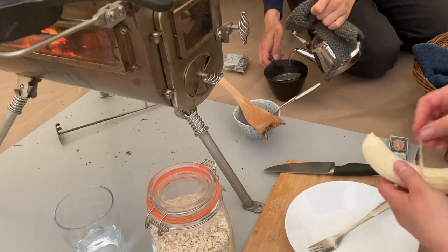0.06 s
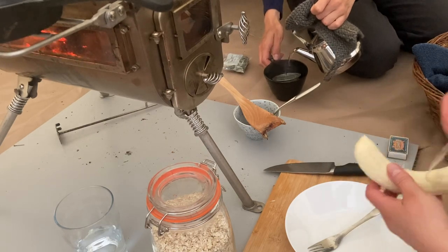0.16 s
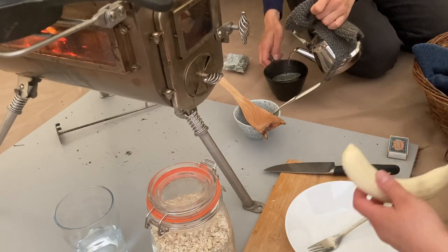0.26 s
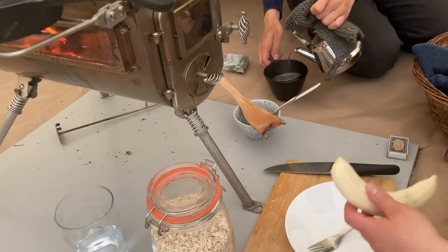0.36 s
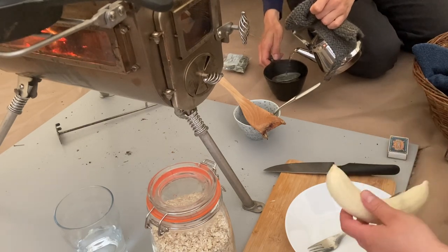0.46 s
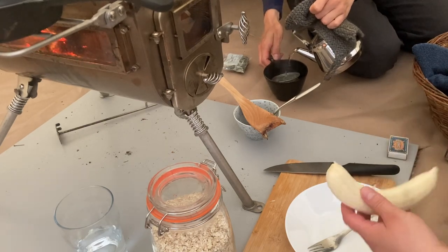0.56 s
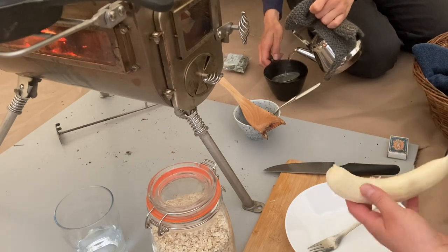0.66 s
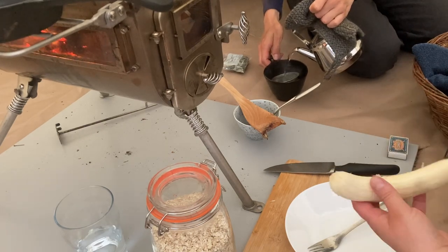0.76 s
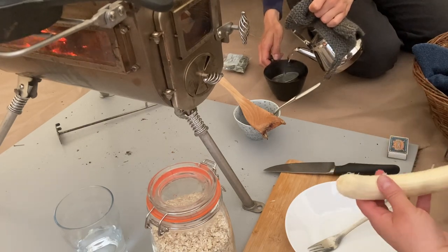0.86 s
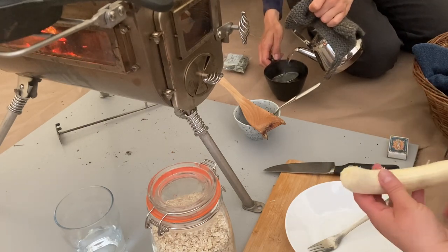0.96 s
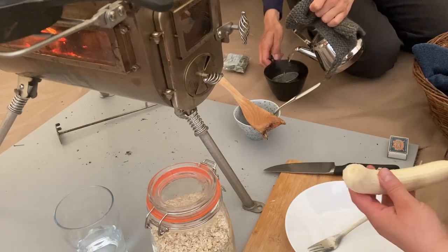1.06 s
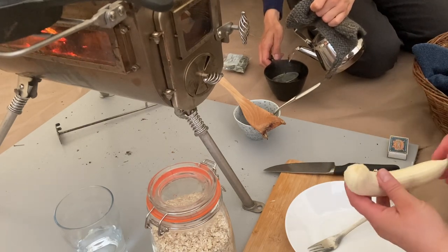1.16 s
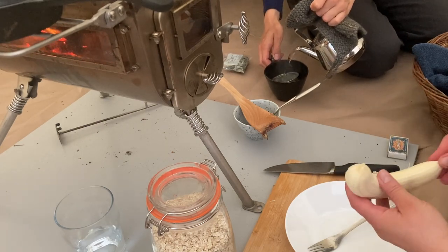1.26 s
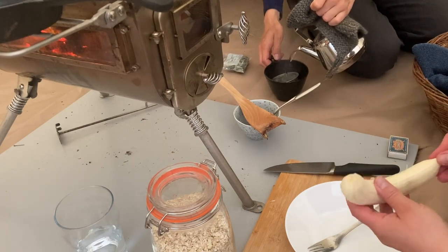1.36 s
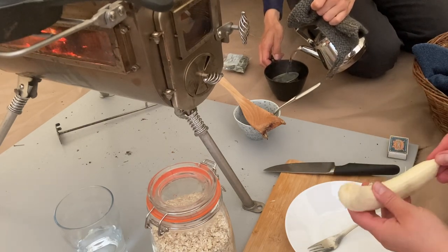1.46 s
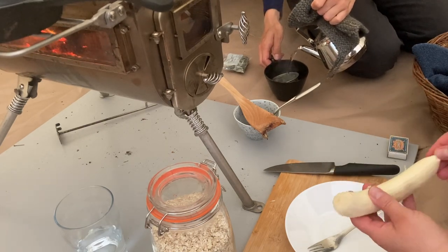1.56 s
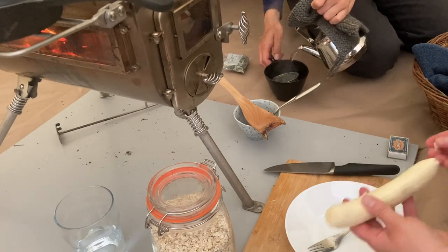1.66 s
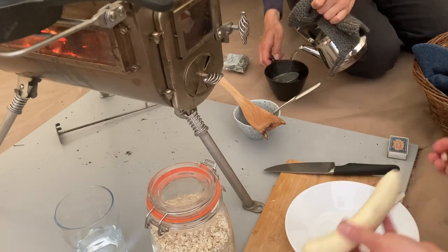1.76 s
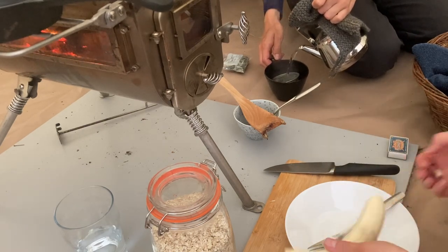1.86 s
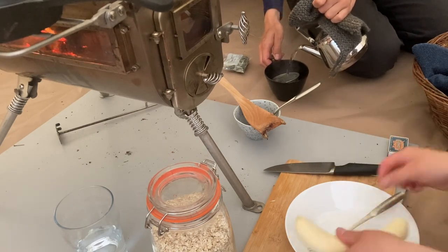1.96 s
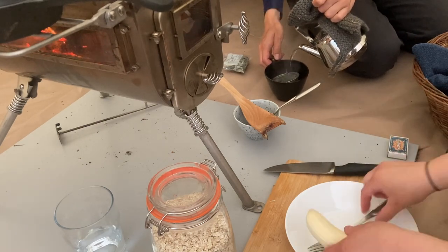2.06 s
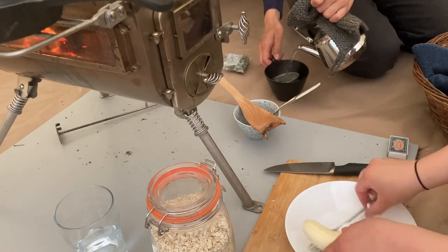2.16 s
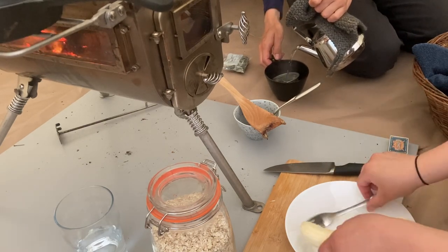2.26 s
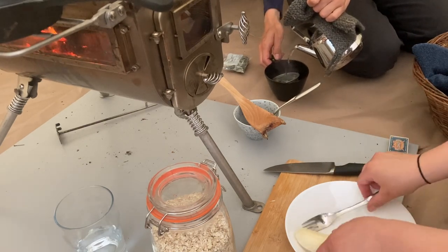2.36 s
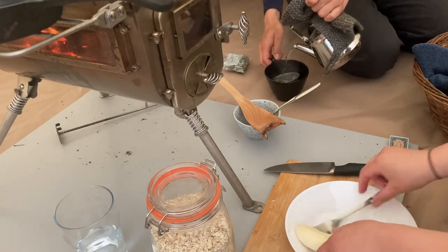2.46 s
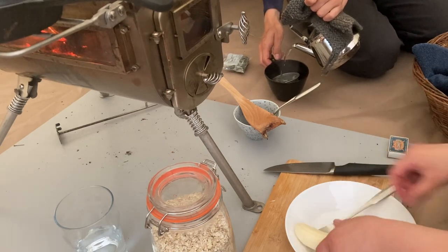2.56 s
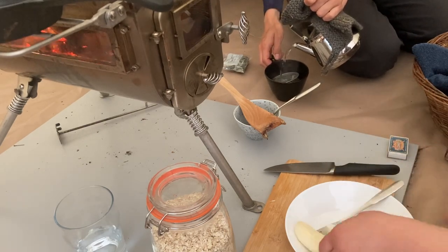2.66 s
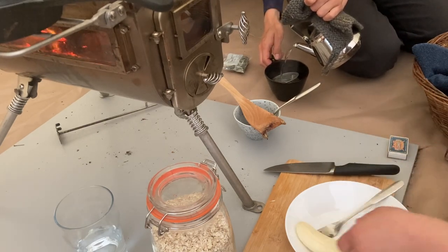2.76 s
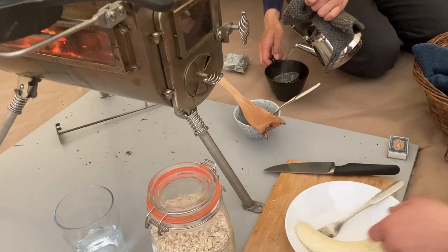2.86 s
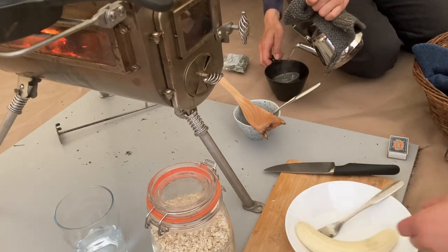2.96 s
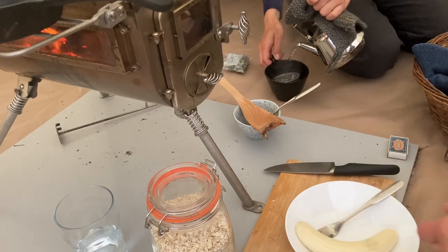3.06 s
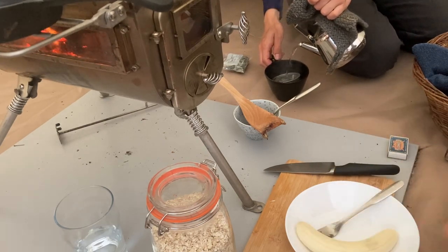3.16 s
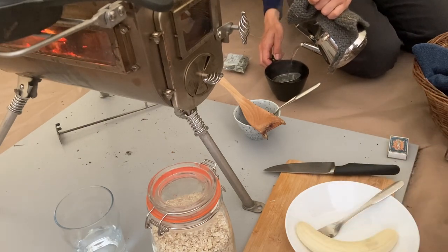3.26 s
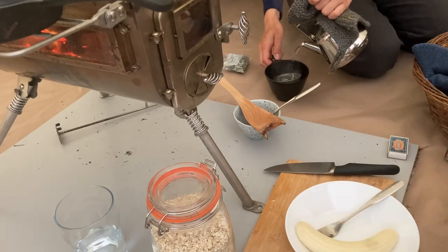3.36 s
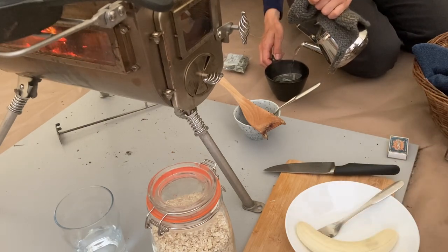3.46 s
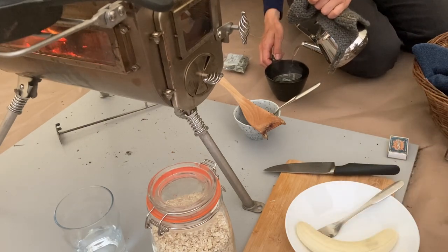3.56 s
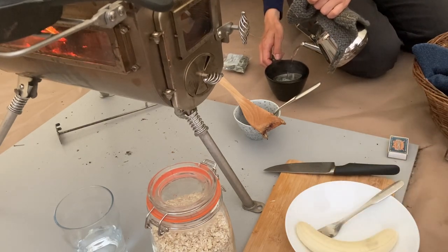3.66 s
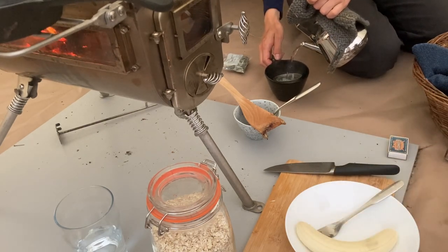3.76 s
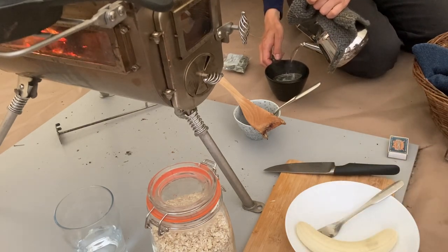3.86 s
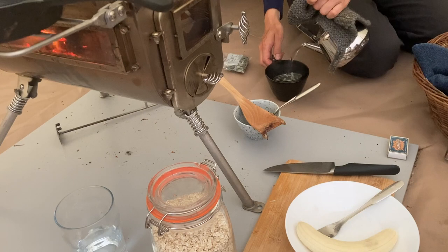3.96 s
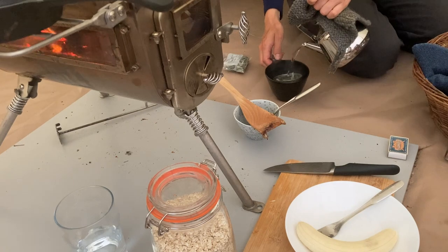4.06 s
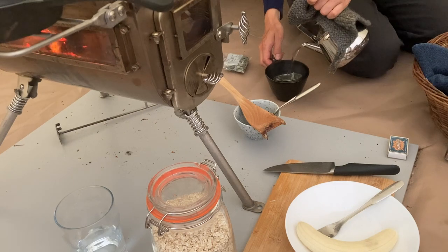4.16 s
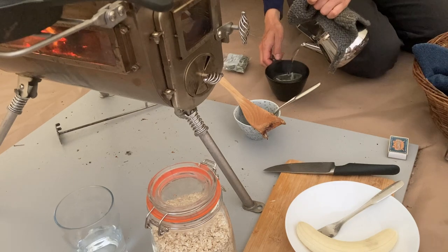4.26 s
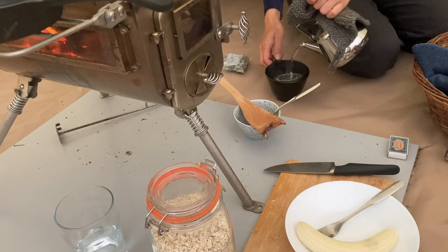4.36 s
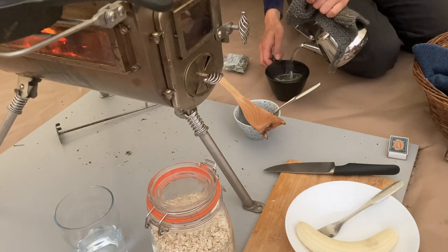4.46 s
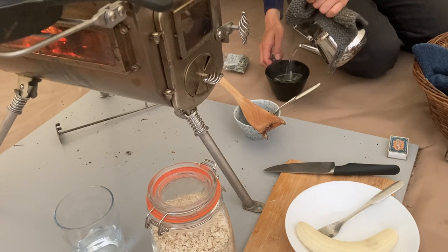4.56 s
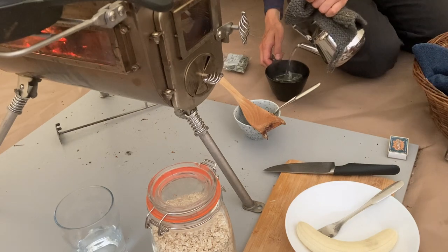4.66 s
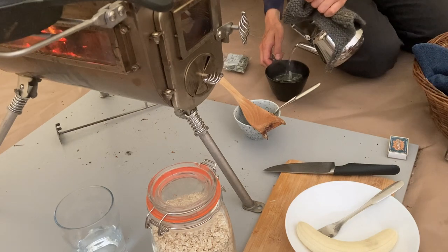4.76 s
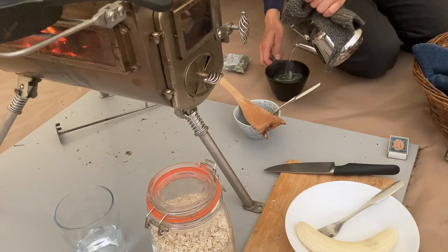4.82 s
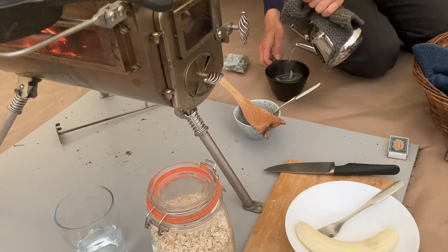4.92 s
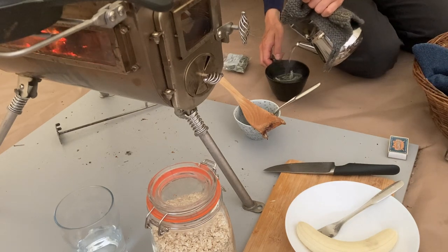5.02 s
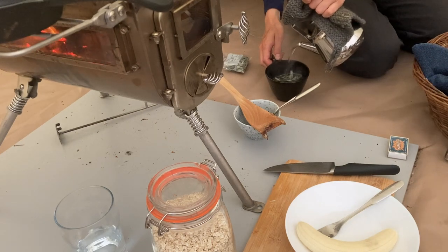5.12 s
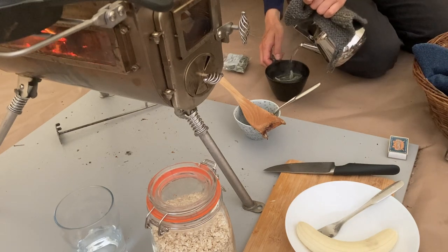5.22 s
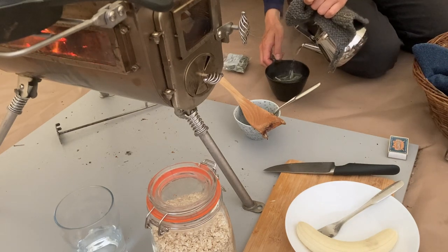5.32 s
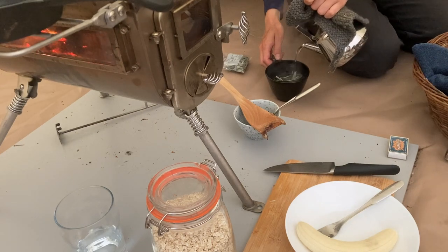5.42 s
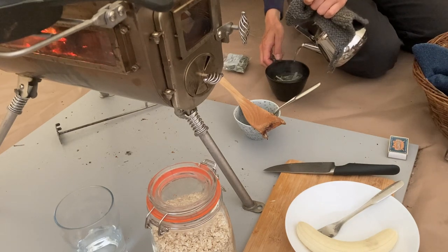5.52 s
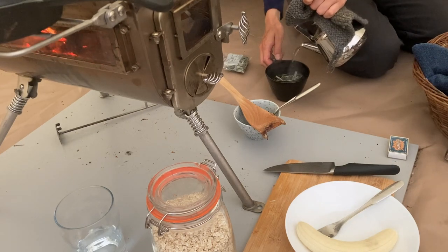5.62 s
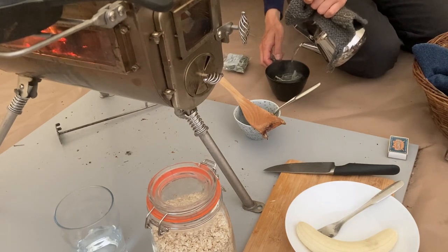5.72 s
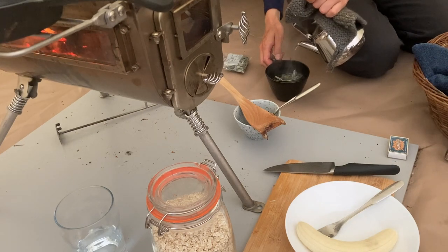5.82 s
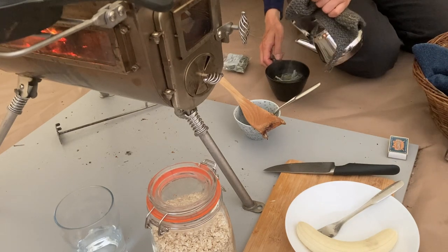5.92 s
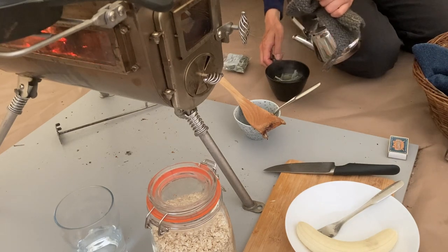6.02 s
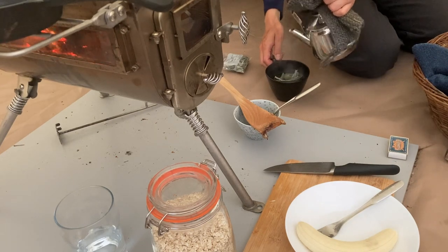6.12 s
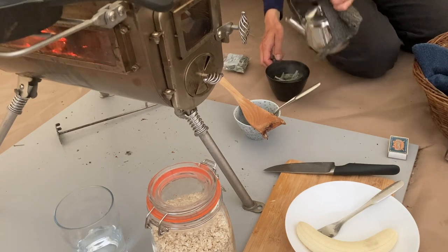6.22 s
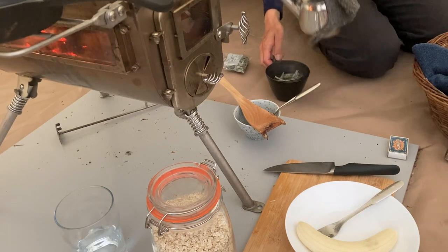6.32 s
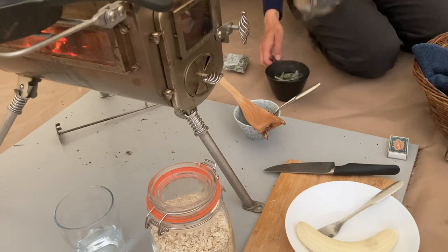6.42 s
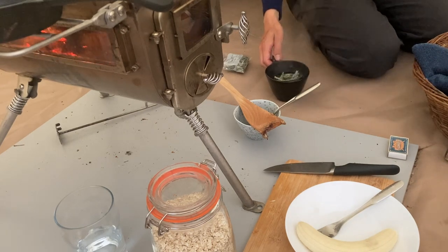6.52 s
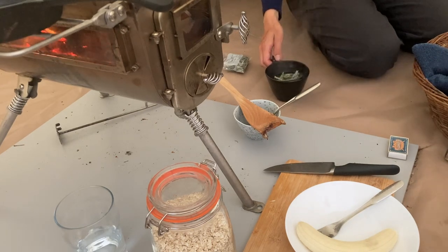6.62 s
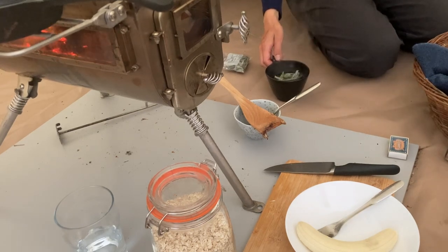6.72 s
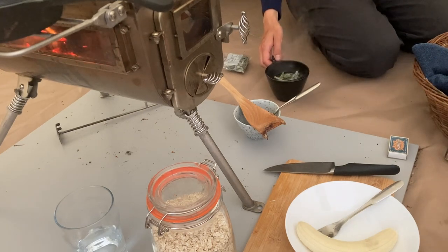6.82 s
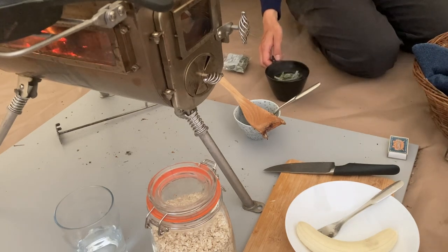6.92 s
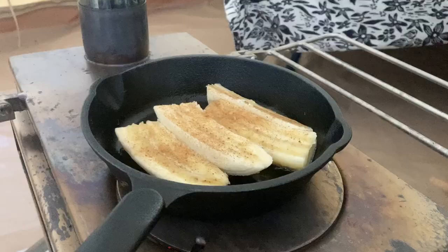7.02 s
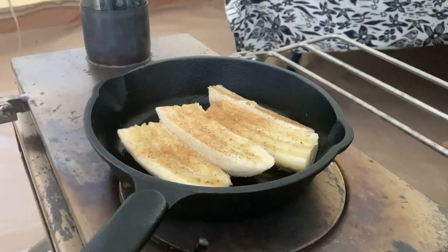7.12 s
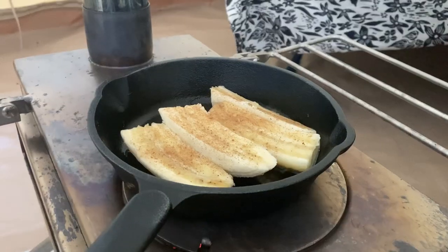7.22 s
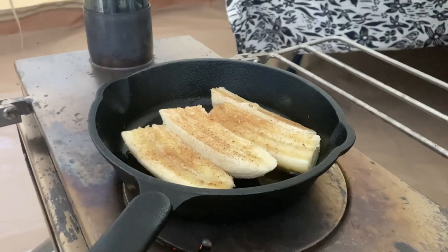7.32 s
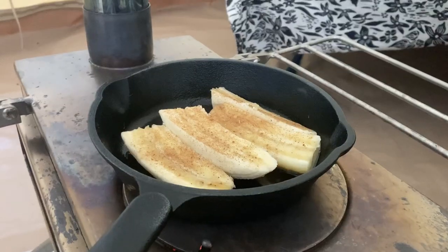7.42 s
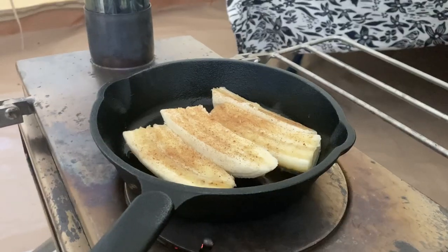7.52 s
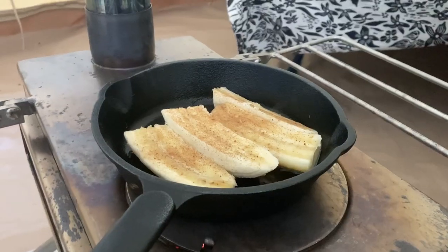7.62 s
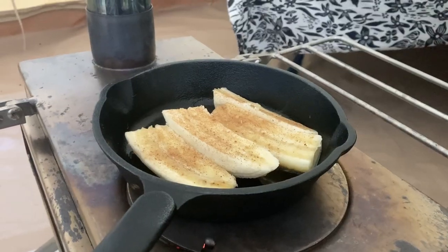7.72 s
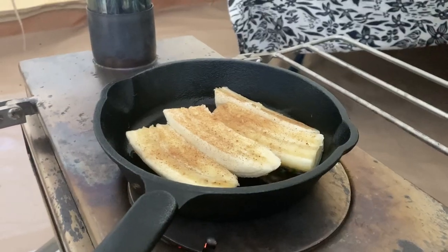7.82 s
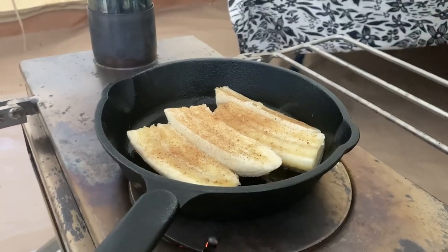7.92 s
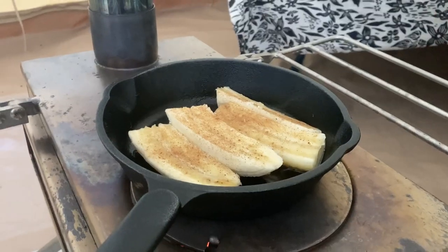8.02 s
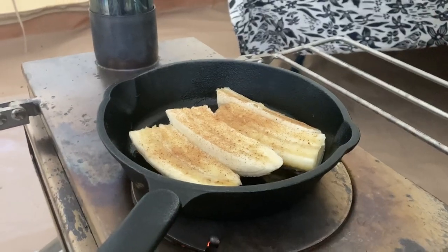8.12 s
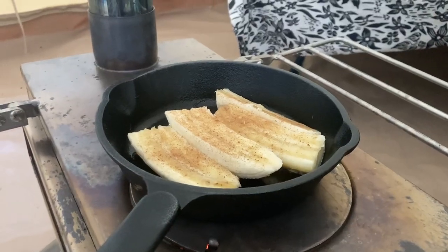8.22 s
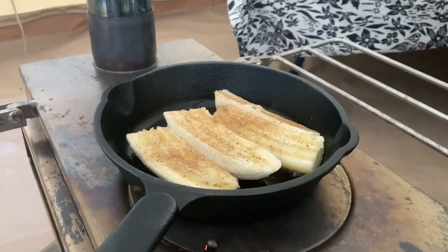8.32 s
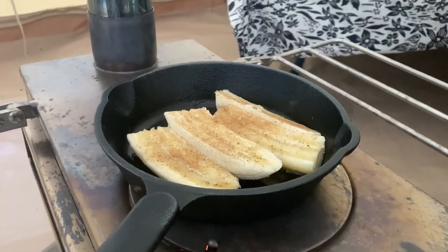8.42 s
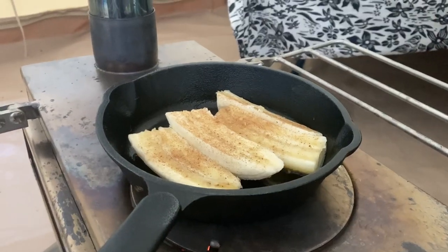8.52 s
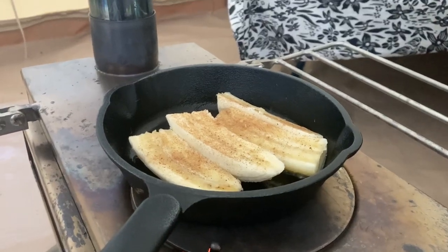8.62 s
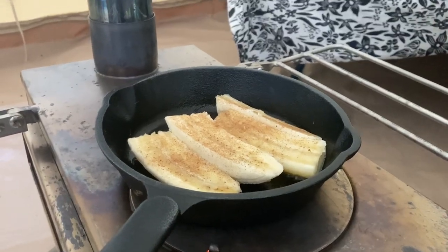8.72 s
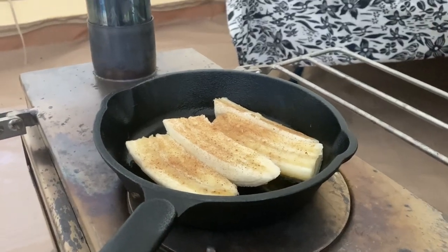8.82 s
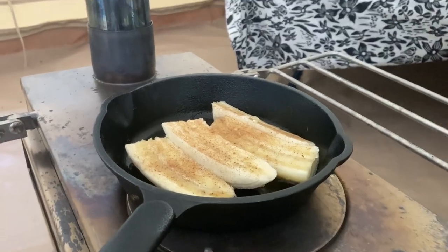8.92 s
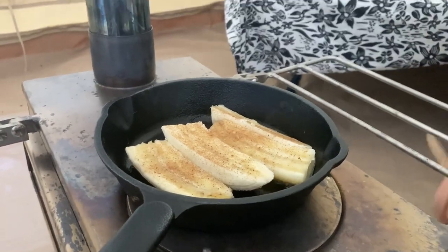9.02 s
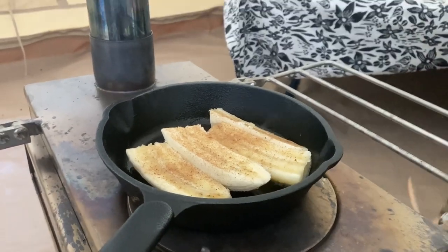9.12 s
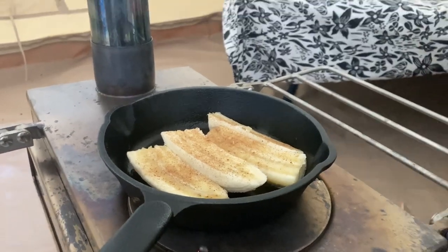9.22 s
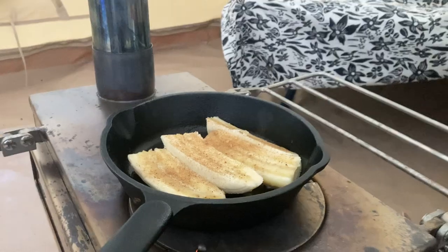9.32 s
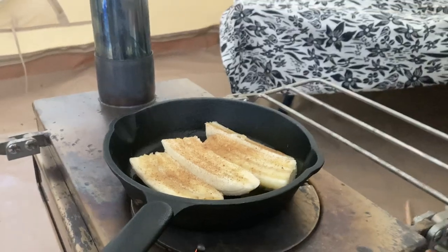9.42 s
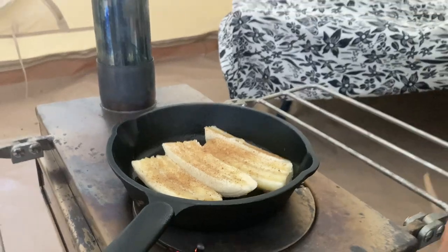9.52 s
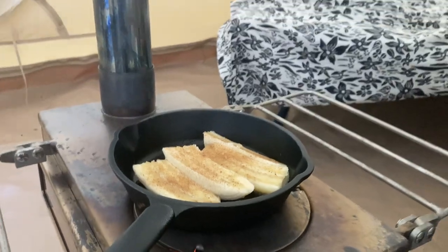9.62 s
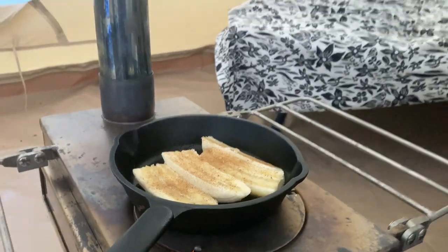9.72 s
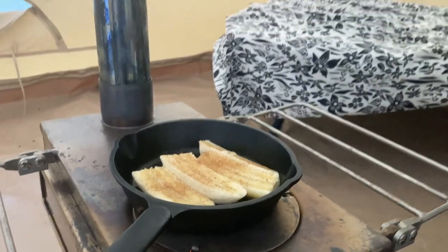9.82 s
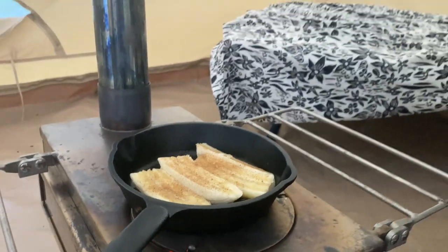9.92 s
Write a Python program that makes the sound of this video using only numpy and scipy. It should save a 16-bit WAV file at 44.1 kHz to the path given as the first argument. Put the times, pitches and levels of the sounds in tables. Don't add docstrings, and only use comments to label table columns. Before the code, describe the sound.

Inside a quiet tent, a wood stove hums low while cloth and hands rustle faintly with tiny dry ticks. A fork clatters brightly on a plate around two seconds, with soft thuds, then near silence and a brief scuffing rustle at five. At seven it cuts abruptly to fruit frying close by, hissing and crackling with sharp pops, hollow wooden knocks and small metal clinks. Phone microphone, stereo, dry small space.

```python
import sys
import numpy as np
from scipy import signal
from scipy.fft import rfft, irfft, next_fast_len
from scipy.io import wavfile
from scipy.ndimage import uniform_filter1d, minimum_filter1d

SR = 44100
rng = np.random.default_rng(int(sys.argv[2]) if len(sys.argv) > 2 else 0)


def pcm_store(signal):
    levels = np.round(np.clip(np.atleast_2d(signal), -1, 1) * 32767)
    wavfile.write(sys.argv[1], SR, levels.astype(np.int16).T)


def magnitude_from_level(level_db):
    exponent = np.asarray(level_db, float) / 20
    return 10 ** exponent


N = 440118
T = np.arange(N) / SR
M = next_fast_len(N, True)
TAIL = T[:SR // 2]
CUT_S = 7.058


def unit(x):
    return x / np.sqrt(np.mean(x ** 2))


def band(x, lo_hz, hi_hz):
    sos = signal.butter(2, [lo_hz, min(hi_hz, .45 * SR)], "band", fs=SR, output="sos")
    return signal.sosfilt(sos, x)


def colour(x, points):
    hz, db = np.transpose(points)
    f = np.fft.rfftfreq(M, 1 / SR) + 1
    gain = magnitude_from_level(np.interp(np.log(f), np.log(hz), db))
    return irfft(rfft(x, M) * gain, M)[..., :N]


def walk(rate):
    k = int(SR / rate)
    steps = np.repeat(rng.standard_normal(N // k + 1), k)
    return uniform_filter1d(uniform_filter1d(steps, k), k)[:N]


def add(out, s, x):
    i = int(s * SR)
    out[i:i + len(x)] += x[:N - i]


def fade(t60):
    return np.exp(-np.log(1000) * TAIL / max(t60, .002))


def ring(x, hz, t60):
    r, w = np.exp(-np.log(1000) / (min(t60, .6) * SR)), 2 * np.pi * hz / SR
    return signal.lfilter([np.sin(w)], [1, -2 * r * np.cos(w), r * r], x)


def snap(hz, cycles):
    t = np.arange(-64, 65) / SR
    return np.exp(-(t * hz / cycles) ** 2) * np.cos(2 * np.pi * hz * t)


def grains(rate, scatter_db, channels=1):
    u = rng.random((2, channels, N))
    hit = np.abs(u[0] - .5) < rate / SR / 2
    size_db = scatter_db * np.minimum(-np.log(1 - u[1]), 4)
    return hit * np.sign(u[0] - .5) * magnitude_from_level(size_db)


def spread(x, lag, alike):
    alike = np.clip(alike, 0, 1)
    shared = np.array([np.roll(x[0], lag), x[0]])
    return np.sqrt(alike) * shared + np.sqrt(1 - alike) * x[1:]


def place(x, lag, pan_db, wet_db, t60=0.091):
    ear = band(rng.standard_normal((2, 4096)), 350, 19000) * fade(t60)[:4096]
    ear *= magnitude_from_level(wet_db) / np.sqrt(np.sum(ear[0] ** 2))
    ear[:, :40] = 0
    ear += np.sinc(np.arange(4096) - 12 - np.array([[lag / 2], [-lag / 2]]))
    return signal.fftconvolve(x[None], ear, axes=1)[:, 12:N + 12] * magnitude_from_level([[pan_db / 2], [-pan_db / 2]])


# (frequency [Hz], level [dB per Hz])
STOVE_SPECTRUM = [(15, -36), (36, 2), (76, 2.5), (223, -11), (531, -10.5), (818, -17), (1900, -16),
                  (6920, -36), (9070, -39.5), (10700, -38), (16000, -44.5)]


def stove():
    mid, side = colour(rng.standard_normal((2, N)), STOVE_SPECTRUM)
    side = colour(side, [(60, -15), (300, -11), (700, 0), (1400, 0.5)])
    flutter = band(mid, 30, 170) * (magnitude_from_level(2.5 * walk(9)) - 1)
    level_db = -61.2 + 1.0 * walk(1)
    return (mid + flutter + side * np.array([[1], [-1]])) / np.std(mid) * magnitude_from_level(level_db)


# (time of peak [s], treble level [dB], swell over 20 dB [s], sinking over 20 dB [s], weight [dB])
MOVES = [(0.09, -78, .15, .3, 2), (0.37, -74, .015, .4, -2), (1.48, -82, .8, .6, -8),
         (2.12, -75.5, 1.5, .02, -8), (2.84, -76, .04, .6, 9), (3.55, -72, .5, .4, -2),
         (3.99, -64.5, .6, 1.8, -5), (4.74, -68, 1.2, .2, -5), (4.94, -50, .02, .14, .3),
         (4.99, -51, .04, .1, 1), (5.007, -49, .02, .06, 1), (5.042, -47, .025, .15, 0),
         (5.085, -48, .1, .11, -.7), (5.138, -54, .06, .09, 0), (5.57, -77, .015, .4, -9),
         (5.69, -70.5, .3, .1, 4), (5.81, -67.5, .017, .09, -7), (6.05, -65, .17, .3, -4),
         (6.47, -52.5, .18, .15, -12), (6.87, -65, .23, .4, -8)]


def rustle():
    s, db, rise, fall, weight_db = (c[:, None] for c in np.transpose(MOVES))
    t = T[::64]
    move_db = db - 20 * np.maximum((s - t) / rise, (t - s) / fall)

    def gain(extra_db):
        return np.interp(T, t, np.sqrt(np.sum(magnitude_from_level(move_db + extra_db) ** 2, axis=0)))

    slips = grains(rate=4800, scatter_db=1.0, channels=3) * magnitude_from_level(2.0 * walk(40))
    treble = [(2500, -14.5), (4500, -2), (9000, 3), (16000, -5)]
    high = unit(colour(spread(slips, 4, .4), treble))
    middle = unit(band(spread(slips, 4, 0.35), 1100, 5800))
    low = unit(band(spread(slips, 4, 1.0), 100, 820))
    cloth = gain(0) * high + gain(weight_db) * middle + gain(1.3 * weight_db - 3) * low
    return magnitude_from_level(4.5 + np.array([[-1.1], [1.1]])) * cloth


# (time [s], peak level [dB], centre frequency [Hz])
TICKS = [(0.368, -58, 10400), (0.4584, -58.5, 10400), (0.6569, -69, 3540), (1.1054, -59, 11000),
         (1.3763, -66, 10900), (1.4294, -61, 11200), (1.5389, -59.5, 11300), (1.6773, -53, 11200),
         (2.829, -62, 4370), (2.8539, -59, 11900), (2.8694, -73, 4160), (2.9772, -58, 6500),
         (3.213, -62, 7320), (3.287, -64, 11900), (3.3453, -65, 10400), (3.4394, -54.5, 3890),
         (4.7406, -57, 10400), (4.9316, -39, 7260), (5.0033, -46, 2800), (5.5562, -60.5, 10600),
         (5.6136, -60, 3560), (5.674, -52.5, 3590), (5.8047, -55.5, 10400)]


def ticks():
    out = np.zeros(N)
    for s, db, hz in TICKS:
        tail = unit(band(rng.standard_normal(len(TAIL)), hz / 3.0, hz * 1.78)) * fade(.095)
        add(out, s, magnitude_from_level(db - 3) * tail)
        add(out, s - .001, magnitude_from_level(db + 14.5) * snap(hz, 1.0))
    return out


# (time [s], peak level [dB], centre frequency [Hz])
THUDS = [(0.431, -53, 91.5), (1.43, -49, 71.6), (2.289, -39, 485), (2.339, -45, 470), (2.438, -35.5, 521),
         (2.498, -43, 151), (2.665, -38.5, 153), (2.831, -49.5, 300), (2.9, -47, 543), (3.549, -57, 61.9),
         (4.317, -53, 131.6), (4.932, -41.5, 498), (4.999, -45, 298), (5.075, -44, 470), (5.668, -52, 439),
         (6.688, -46, 390), (6.72, -44, 85)]


def thuds():
    out = np.zeros(N)
    env = fade(.13) * (1 - fade(.02))
    for s, db, hz in THUDS:
        rough = unit(band(rng.standard_normal(len(TAIL)), hz / 1.2, hz * 1.6))
        add(out, s, magnitude_from_level(db + 1.5) * env * (np.sin(2 * np.pi * hz * TAIL) + 0.7 * rough))
    return out


# (time [s], frequency [Hz], level [dB], decay t60 [s])
RINGS = [(2.143, 3320, -52.5, .25), (2.145, 5550, -55, .15), (2.31, 5545, -20, 0.19),
         (2.502, 1908, -41, 0.33), (2.5, 7776, -47, 0.32), (2.46, 1048, -43, .26), (2.447, 6940, -30, .22),
         (2.447, 5530, -27, .16), (7.596, 5120, -24, .14), (2.691, 3347, -43, .47),
         (2.691, 4376, -42, 0.22), (2.691, 2470, -54, .4), (2.692, 5550, -29.5, 0.15),
         (3.44, 1120, -56, 0.13), (3.44, 2330, -56, 0.064), (3.44, 3920, -60.5, .09),
         (3.44, 5360, -59, .04), (2.446, 11333, -21, .16), (2.488, 11340, -22, .17),
         (2.46, 11390, -28, .15), (2.31, 11320, -21, .08), (2.452, 4376, -31, .2), (2.446, 6905, -25, .1),
         (2.52, 6900, -37, .1), (2.692, 520, -47, .12), (2.694, 660, -50, .1), (4.932, 495, -40, .14),
         (4.931, 1250, -42, .035), (4.931, 1810, -42, .05), (4.932, 2756, -44, .04),
         (4.984, 1810, -47, .08), (5.003, 1880, -43, .04), (5.037, 2260, -42, .06), (5.052, 2170, -41, .04),
         (5.068, 2080, -43, .06), (6.702, 275, -42, .09), (6.706, 780, -52, .06), (6.73, 1130, -56, .05),
         (7.345, 5150, -36, .07), (7.365, 2720, -33, .14), (7.37, 2480, -37, .08), (7.605, 5150, -23, .06),
         (7.596, 1110, -32, .07), (7.6, 2750, -34, .13)]


def rings():
    out = np.zeros(N)
    for s, hz, db, t60 in RINGS:
        add(out, s, magnitude_from_level(db) * fade(t60) * (1 - fade(.006)) * np.sin(2 * np.pi * hz * TAIL))
    return out


# (time [s], level [dB], plate share [dB], chatter time [s])
FORK_TOUCHES = [(2.144, -39, -11, 0.0083), (2.1874, -49, -1.5, 0.013), (2.2428, -31, -30.5, 0.019),
                (2.2956, -14.5, -16, 0.0094), (2.3093, -10, -21, 0.0083), (2.3344, -22, -19, 0.0098),
                (2.3594, -22, -18, 0.019), (2.4068, -17, -13, 0.029), (2.4447, -6, -25, 0.012),
                (2.463, -13.5, -16, 0.018), (2.487, -15, -16, 0.035), (2.6907, -19, -15.5, 0.022)]
# (frequency [Hz], level [dB])
FORK_MODES = [(1055, -19.5), (1916, -16.5), (2153, -10.5), (2433, -16), (3318, -12), (4112, -11.5),
              (4376, -1.2), (5017, -17.5), (5534, -0.5), (6696, -11.5), (6910, -3), (7838, -11.5),
              (8118, -2), (8613, -2), (8957, -16), (9216, -4), (9711, -4), (10120, -12), (10615, -16.5),
              (10874, -14), (11335, -0.5), (11627, -10.5), (12618, -10), (13070, -5.5), (13479, -16.5),
              (14298, -13.5), (14642, -17), (14879, -12.5), (15353, -19.5), (15525, -14)]


def fork():
    out = np.zeros(N)
    for s, db, plate_db, hold in FORK_TOUCHES:
        chance = rng.standard_normal((3, len(TAIL)))
        chatter = chance[0] * (np.abs(chance[1]) > 1.2) * 0.13
        chatter *= np.exp(-np.log(1000) * np.maximum(TAIL - hold, 0) / 0.13)
        chatter *= 1 + 2.0 * fade(0.021)
        chatter *= 1 - fade(.003)
        chatter[0] = .8
        body = magnitude_from_level(19) * band(chatter, 3000, 15500)
        body += magnitude_from_level(plate_db + 18) * band(band(chatter, 1200, 3200), 1000, 3500)
        for k, (hz, mode_db) in enumerate(FORK_MODES):
            pair = ring(chatter, hz, 0.079) + 0.69 * ring(chatter, hz + 110 * chance[2, -k - 1], 0.081)
            share_db = (hz < 3000) * (plate_db + 17)
            body += magnitude_from_level(mode_db + 3.0 * chance[2, k] + share_db) * pair
        add(out, s, magnitude_from_level(db - 22.5) * band(band(body, 950, 19000), 950, 19000))
    return out


# (time [s], level [dB], half
# length [s], centre frequency [Hz])
SWISHES = [(2.841, -56.5, 0.017, 890), (2.93, -58.5, 0.075, 650), (3.104, -63.5, .02, 3000),
           (3.531, -62.5, 0.037, 6000), (3.583, -54.5, 0.022, 5600), (3.87, -64.5, 0.027, 8000),
           (5.061, -44, 0.035, 2230), (5.27, -60, 0.019, 4500), (5.629, -61, 0.016, 8500),
           (5.92, -68, .015, 9000), (6.703, -55, 0.015, 620), (5.007, -41.5, 0.011, 1900),
           (2.31, -52.5, .03, 119.8), (2.464, -49, 0.045, 120.2)]


def swishes():
    out, t = np.zeros(N), T[:8820]
    for s, db, half_s, hz in SWISHES:
        chance = rng.standard_normal((2, len(t)))
        grain = unit(band(chance[0] * chance[1] ** 2, hz / 3.9, hz * 2.1))
        add(out, s - .1, magnitude_from_level(db) * grain * np.exp(-((t - .1) / half_s) ** 2))
    return out


# (frequency [Hz], width [Hz], level [dB])
PAN_MODES = [(1320, 260, 3), (1630, 200, 1), (2350, 130, 3), (2640, 150, -6), (3540, 210, 3),
             (4510, 150, 2)]


def iron(x):
    f = np.fft.rfftfreq(M, 1 / SR)
    gain_db = sum(db / (1 + (2 * (f - hz) / width) ** 2) for hz, width, db in PAN_MODES)
    return irfft(rfft(x, M) * magnitude_from_level(gain_db), M)[..., :N]


# (frequency [Hz], level [dB per Hz])
FAT_SPECTRUM = [(350, -13), (1250, -5), (2600, -4.5), (3560, 1.5), (5130, -3.5), (6800, 1), (8420, -3),
                (9230, 4), (10300, -1.5), (16000, 1.5)]


def sizzle():
    loudest_s = max(POPS, key=lambda row: row[1])[0]
    spit_db = 6 * (T > loudest_s) * np.exp(-np.abs(T - loudest_s) / .03)
    peak_s, swell, sag = 8.45, 1.4, 2.2
    db = -37.1 - np.maximum(swell * (peak_s - T), sag * (T - peak_s))
    hiss = spread(unit(grains(rate=9000, scatter_db=2.5, channels=3)), -5, .5)
    crackle = np.zeros(N)
    for hz in (1300, 2800, 5500, 8000, 11000, 14500):
        bursts = np.convolve(grains(rate=260, scatter_db=3.5)[0], snap(hz, 0.81), "same")
        crackle += unit(bursts) * np.sqrt(hz / 8000)
    bed = hiss * magnitude_from_level(3.1 * walk(35)) + magnitude_from_level(-1.2) * place(unit(crackle), -6, 0, -7, 0.014)
    fat = iron(colour(bed, FAT_SPECTRUM))
    high = band(fat, 5000, 19000)
    return (magnitude_from_level(spit_db) * high + magnitude_from_level(3.0) * (fat - high)) / np.std(high) * magnitude_from_level(db + 0.5)


def small_pops():
    u = rng.random((110, 4)).T
    s = CUT_S + .05 + (N / SR - CUT_S - .1) * u[0]
    peak_db, hz = -30 + 5.5 * u[1], 6300 + (12500 - 6300) * u[2]
    low_db = -18 + 12 * (u[3] - .5)
    return np.transpose([s, peak_db, hz, low_db]).tolist()


# (time [s], peak level [dB], centre frequency [Hz], low part relative to peak [dB])
POPS = [(7.118, -18, 8650, -12), (7.4454, -11, 12500, -29), (7.5609, -12, 8700, -18),
        (7.5957, -19, 7860, -16), (7.681, -17.5, 7440, -14), (7.7368, -20, 10400, -16),
        (7.9318, -11.5, 9300, -21), (8.0256, -17.5, 7160, -22), (8.1505, -19.5, 6500, -16),
        (8.2377, -14, 8500, -19), (8.2592, -13.5, 9900, -16), (8.3115, -19, 10500, -25),
        (8.3472, -14.5, 10400, -23), (8.3805, -19.5, 9840, -15), (8.4125, -8.5, 8400, -25),
        (8.4146, -5, 9000, -21), (8.475, -14.5, 8550, -16), (8.538, -20.5, 9550, -8.5),
        (8.5622, -14.5, 9800, -20), (8.7196, -15.5, 13100, -12.5), (8.7789, -17.5, 7300, -14),
        (8.9268, -11.5, 13200, -18), (8.9857, -13, 8400, -24), (9.0855, -18.5, 11300, -13.5),
        (9.1709, -18, 9800, -11.5), (9.3998, -20, 10700, -16), (9.4778, -17, 8200, -21),
        (9.5703, -19, 9350, -18), (9.8524, -18, 9300, -28), (9.8973, -18, 9300, -13.5)]
# (time [s], peak level [dB], centre frequency [Hz])
CRACKS = [(7.0812, -27, 6900), (7.0882, -26, 11300), (7.1047, -22, 7600), (7.392, -21, 8100),
          (7.414, -24, 9000), (7.4883, -23, 7500), (7.4945, -24, 9000), (7.5457, -21, 11500),
          (7.6737, -21, 7500), (7.7118, -22, 7600), (7.7916, -21, 10900), (7.8385, -18, 13000),
          (7.8964, -20, 12100), (8.051, -20, 7600), (8.2147, -22, 11600), (8.2402, -17, 8000),
          (8.3015, -22, 9000), (8.5968, -21, 7000), (8.3314, -23, 8000), (8.3873, -19, 8500),
          (8.4995, -22, 11900), (8.5279, -20.5, 11500), (8.5938, -20, 8000), (8.6986, -19, 11400),
          (8.7559, -21.5, 12000), (8.8781, -23, 11700), (8.9126, -22, 11800), (8.952, -21, 7500),
          (9.0163, -22, 7400), (9.0488, -22, 8100), (9.0912, -21, 12000), (9.1415, -20, 7600),
          (9.1767, -22, 11000), (9.2234, -22, 9000), (9.2553, -21, 8500), (9.3246, -20, 8000),
          (9.3695, -21, 7600), (9.4195, -23, 10000), (9.4548, -21, 8400), (9.5187, -23, 11600),
          (9.6828, -22, 7900), (9.7262, -23, 8300), (9.7562, -22, 11500)]


def pops():
    out = np.zeros(N)
    cracks = [(*row, -19) for row in CRACKS]
    for s, peak_db, hz, low_db in POPS + cracks + small_pops():
        puff = snap(1590, 0.54) + 1.2 * snap(3600, .7)
        click = snap(hz, 1.05) + 0.45 * snap(15000, 1.6) + magnitude_from_level(low_db - 2.5) * puff
        add(out, s - 64 / SR, magnitude_from_level(peak_db + 2.5) * click)
    return out


# (time [s], peak level [dB], pitch [Hz], decay t60 [s])
KNOCKS = [(7.289, -38.5, 1170, 0.05), (7.542, -41, 1154, 0.05), (7.642, -37, 1046, 0.095),
          (7.734, -39.5, 1095, 0.05), (7.749, -31.5, 697, 0.026), (7.805, -36, 830, 0.041),
          (7.84, -45, 1160, 0.05), (7.916, -38, 700, 0.057), (7.931, -19, 695, 0.029),
          (7.949, -39, 720, 0.034), (8.058, -41, 1320, .03), (8.188, -41.5, 683, 0.11),
          (8.205, -40, 1110, .04), (8.211, -38, 720, 0.04), (8.272, -31, 716, 0.037),
          (8.282, -35, 1080, .05), (8.287, -24, 692, 0.025), (8.322, -43, 680, 0.05),
          (8.365, -41, 1540, .025), (8.395, -42, 614, .04), (8.413, -33, 668, 0.054),
          (8.429, -40, 1095, 0.063), (8.444, -41, 1073, 0.059), (8.44, -46, 480, .05),
          (8.48, -32, 1180, 0.03), (8.537, -40, 1510, .02)]


def knocks():
    out = np.zeros(N)
    for s, db, hz, t60 in KNOCKS:
        env = fade(t60) * (1 - fade(0.005))
        tone = np.sin(2 * np.pi * hz * TAIL) + .3 * np.sin(2 * np.pi * 1.6 * hz * TAIL)
        rough = unit(band(rng.standard_normal(len(TAIL)), hz / 1.3, hz * 1.55))
        add(out, s, magnitude_from_level(db + 3.5) * env * (tone + 0.55 * rough))
    return out


# (time [s], low level [dB], middle level [dB], high level [dB])
CLINKS = [
    (7.3447, -37, -29, -38.5),
    (7.5949, -39.5, -37, -31),
    (7.6345, -46, -42.5, -35),
]
# (frequency [Hz], decay t60 [s])
CLINK_MODES = [
    [(1090, 0.08), (1180, 0.097)],
    [(2450, 0.04), (2740, 0.09)],
    [(5120, 0.05), (5200, 0.018)],
]


def clinks():
    out = np.zeros(N)
    for s, *dbs in CLINKS:
        chatter = rng.standard_normal(len(TAIL)) * fade(0.06) * 0.15
        chatter[0] = 1
        add(out, s, magnitude_from_level(dbs[0] + 26) * band(band(chatter, 1000, 5500), 1000, 5500))
        for db, modes in zip(dbs, CLINK_MODES):
            add(out, s, magnitude_from_level(db - 2.5) * sum(ring(chatter, hz, t60) for hz, t60 in modes))
    return out


# (time [s], level [dB], first frequency [Hz], last frequency [Hz], decay t60 [s])
PLOPS = [
    (9.138, -34, 910, 107, 0.073),
    (9.294, -47.5, 494, 130, 0.097),
]


def plops():
    out = np.zeros(N)
    for s, db, hz0, hz1, t60 in PLOPS:
        hz = hz1 + (hz0 - hz1) * fade(0.0265)
        add(out, s, magnitude_from_level(db) * fade(t60) * np.sin(2 * np.pi * np.cumsum(hz) / SR))
    return out


def scene():
    air = stove()
    cloth = rustle()
    free = rings()
    small = place(ticks() + thuds() + swishes(), 2.8, -1.5, -3.5)
    near = cloth + small + place(fork() + free, 2.0, 1.0, -3)
    handled = band(knocks() + clinks(), 390, 13000) + plops()
    pan = sizzle() + place(pops(), -5, .3, -6, .012)
    pan += place(handled, 6.2, 0.67, -8, .06) + place(free, -1.5, 0, -9)
    out_gain = np.clip((CUT_S - T) / 0.027, 0, 1)
    in_gain = np.clip((T - CUT_S) / 0.021, 0, 1)
    return (near + air) * out_gain + (pan + air * magnitude_from_level(-8)) * in_gain


def joint(x, margin_db):
    _, _, z = signal.stft([x[0] + x[1], x[0] - x[1]], nperseg=2048)
    edges = np.unique((1024 * (np.arange(13, 53) / 60) ** 1.9).astype(int))
    power = np.add.reduceat(np.abs(z) ** 2, edges, axis=1) + 1e-18
    lead_db = uniform_filter1d(10 * np.log10(power[0] / power[1]), size=3)
    doubt = 6.0 * uniform_filter1d(rng.standard_normal((2, *lead_db.shape)), size=5)
    loud = np.abs(np.diff(x[0], prepend=0))
    crest = -minimum_filter1d(-loud, size=1024) / uniform_filter1d(loud, size=2048)
    calm = np.interp(np.arange(z.shape[2]) * 1024, np.arange(N), crest) < 14.5
    keep = 1 - (np.array([-lead_db, lead_db]) + doubt > margin_db) * calm
    z[:, edges[0]:] *= np.repeat(keep, np.diff(edges, append=1025), axis=1)
    total, difference = signal.istft(z, nperseg=2048)[1][:, :N]
    return np.array([total + difference, total - difference]) / 2


def top_cut(x):
    return signal.sosfilt(signal.butter(12, 17140, fs=SR, output="sos"), x)


def record(dry):
    mono_hz, spread_hz, in_phase_hz = 6220, 4560, 6813
    f, spectrum = np.fft.rfftfreq(M, 1 / SR), rfft(dry, M)
    share = np.clip((f - mono_hz) / 500 + .5, 0, 1)
    turn = np.exp(1j * np.pi * (f - in_phase_hz) / spread_hz * np.array([[-1], [1]]))
    high_cut = magnitude_from_level(-60 * np.clip((f - 15750) / 250, 0, 1))
    low_cut = f ** 3 / (f ** 3 + 36 ** 3)
    mixed = spectrum * (1 - share) + share * (spectrum[0] * turn + 0.2 * spectrum[1])
    heard = irfft(mixed * high_cut * low_cut, M)[:, :N]
    finished = joint(heard, margin_db=8.5)
    return top_cut(finished)


dry = scene()
out = record(dry)
pcm_store(out)
```